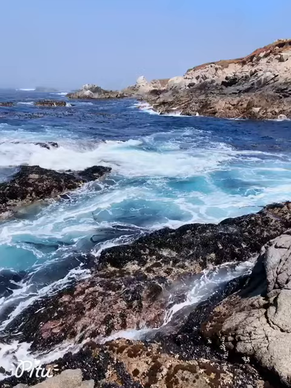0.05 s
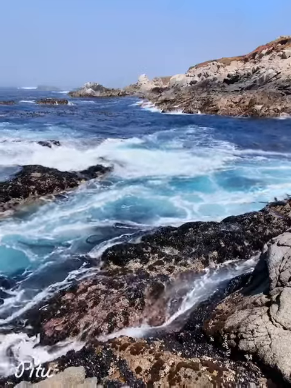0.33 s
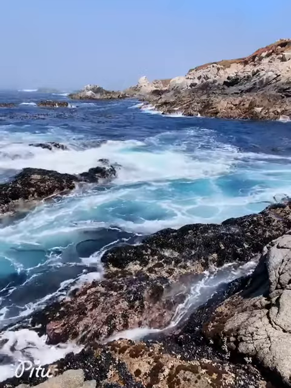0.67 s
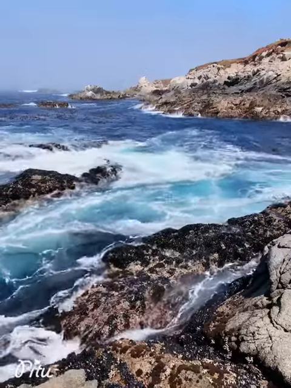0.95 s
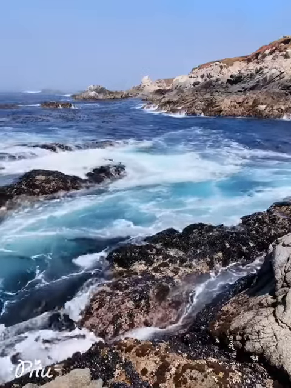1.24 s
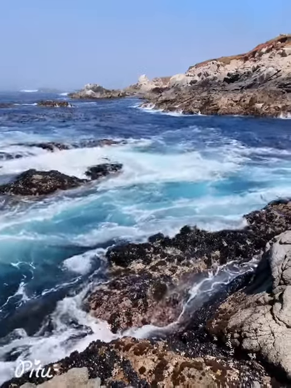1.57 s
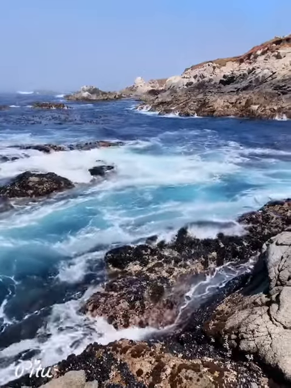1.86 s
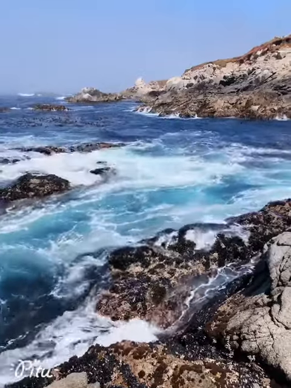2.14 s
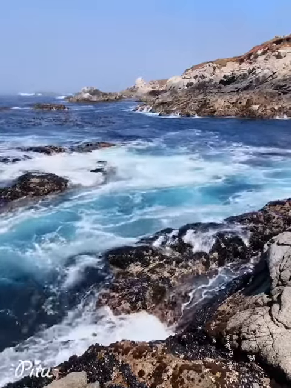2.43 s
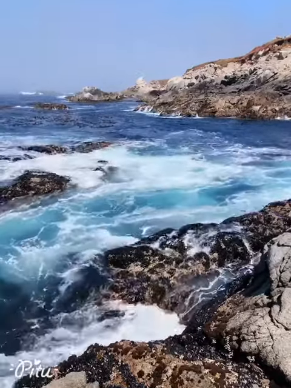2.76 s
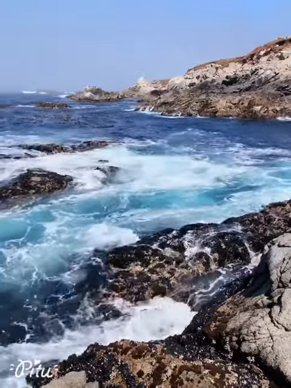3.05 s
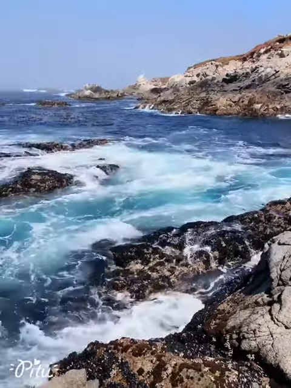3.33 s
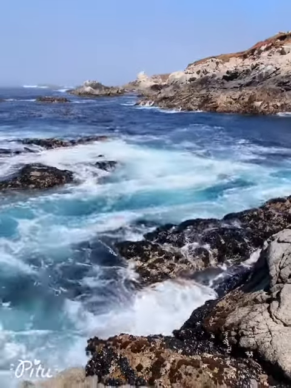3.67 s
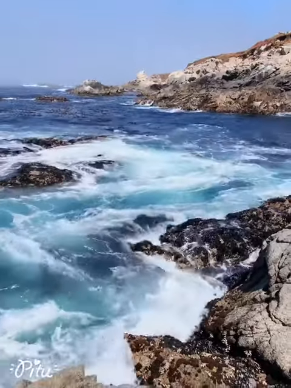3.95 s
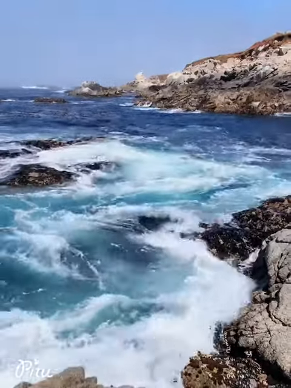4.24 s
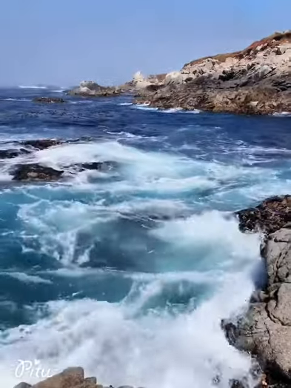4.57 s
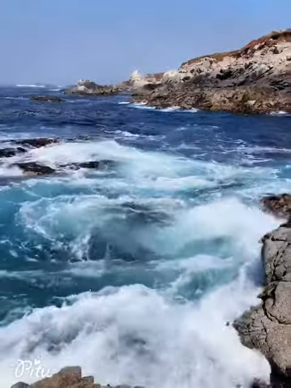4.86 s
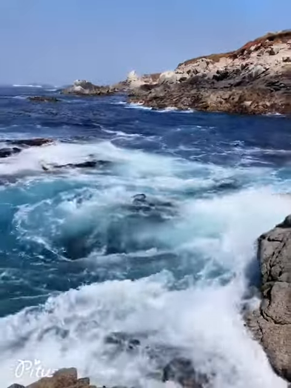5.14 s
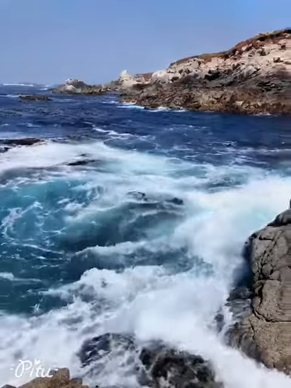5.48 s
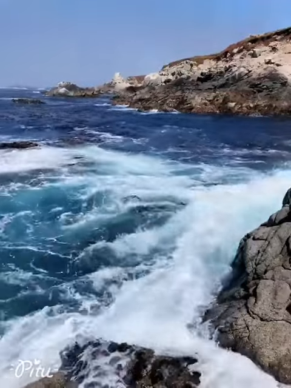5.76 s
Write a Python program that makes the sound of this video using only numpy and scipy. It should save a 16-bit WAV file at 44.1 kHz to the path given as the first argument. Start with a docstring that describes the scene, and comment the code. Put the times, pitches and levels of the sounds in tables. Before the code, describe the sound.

Surf churns in a rocky cove, heard from the rocks just above the water. Waves swell one after another with a roar, fizzing foam and spray pattering on stone, and a thin hiss of runoff drains away early on. Gusty wind rumbles and drums directly on the microphone, louder than the sea. It is strongest around the middle, with clusters of hard pops, then eases somewhat toward the end.

```python
"""Surf in a rocky cove, heard from the rocks just above a gully that floods as each wave breaks.
Bubbles make the white water roar and its foam fizz; spray rains on rock, runoff hisses down a channel.
Right at the microphone, a gusty sea wind rumbles and drums, louder than the water below.
Its hardest eddies pop on the port and push a limiter down."""
import sys
import numpy as np
from scipy import signal
from scipy.fft import rfft, irfft, next_fast_len
from scipy.io import wavfile
from scipy.ndimage import uniform_filter1d, minimum_filter1d

SR = 44100
rng = np.random.default_rng(int(sys.argv[2]) if len(sys.argv) > 2 else 0)


def wrap_up_sound(samples):
    """Save the sound to the file named by the first command line argument, as 16-bit audio."""
    columns = np.atleast_2d(samples).T
    # keep every value between -1 and 1, then stretch to whole-number steps
    tamed = np.clip(columns, -1, 1)
    steps = np.round(tamed * 32767).astype(np.int16)
    wavfile.write(sys.argv[1], SR, steps)


N = 264864

# hard eddies that strike the microphone: (time [s], level [dB], pitch [Hz], decay [s], crispness [dB])
HARD_EDDIES = [(0.484, -15, 698, 0.0032, 4), (0.703, -19, 535, 0.0027, -2), (0.715, -16, 798, 0.0027, 2),
               (0.74, -13, 643, 0.0032, 0), (1.151, -10.5, 603, 0.0064, -8), (2.205, -4.5, 781, 0.005, 0),
               (2.227, -4.5, 171, 0.0048, 10), (2.462, -10, 658, 0.0047, -2), (2.498, -6, 604, 0.004, -2),
               (2.588, -0.5, 822, 0.0022, 3), (2.631, -3, 799, 0.0034, 5), (2.727, -5, 539, 0.0047, -4),
               (2.737, 1, 598.6, 0.0047, 0), (2.747, 1.5, 187, 0.0055, 0), (2.87, -10, 635, 0.0038, -1),
               (2.92, -10, 603, 0.0053, -2), (2.935, -9.5, 682, 0.0055, -5), (2.954, -8, 473, 0.0055, -4),
               (3.089, -3.5, 568, 0.0044, -4), (3.162, -6, 501, 0.0038, -4), (3.21, -12, 672, .003, 3),
               (3.241, -10, 765, 0.007, -5), (3.26, -9, 602, 0.0046, -3), (3.359, -14, 600, 0.0084, -2),
               (3.602, -14, 731, 0.0078, -1), (3.78, -9.5, 700, 0.0057, -2), (4.025, -10, 534, 0.0032, 2),
               (4.037, -13, 758, 0.0036, 3), (4.364, -4, 660, 0.0056, -7), (4.375, -6.5, 689, 0.0022, -2),
               (4.421, -5.5, 255.4, 0.017, 5), (4.527, -8, 521, 0.0067, 4), (4.624, -14, 571, 0.0032, -6),
               (5.514, -2.5, 702, 0.0028, 3), (5.888, -8.5, 545, 0.0023, -5), (5.949, -9, 549, 0.0025, -1)]


def from_db(db):
    """Decibels to gain."""
    return 10 ** (np.asarray(db) / 20)


def rms_one(x):
    """Scale to unit power."""
    return x / np.sqrt(np.mean(x ** 2) + 1e-20)


def in_time(curve):
    """A curve of (time, value) points, sample by sample."""
    return np.interp(np.arange(N) / SR, *np.transpose(curve))


def hump(middle_s, rise_s, fall_s):
    """A rounded rise to 1 and fall back."""
    t = np.arange(N) / SR - middle_s
    return np.exp(-np.minimum((t / np.where(t < 0, rise_s, fall_s)) ** 2, 50))


def drift(per_s):
    """A smooth random wander with spread 1, changing about per_s times a second."""
    hop, settle = 40, 2000
    pole = np.exp(-2 * np.pi * hop * per_s / SR)
    noise = rng.standard_normal(N // hop + settle + 2)
    slow = signal.lfilter([1], [1, -2 * pole, pole * pole], noise)[settle:]
    return np.interp(np.arange(N) / hop, np.arange(len(slow)), rms_one(slow))


def coloured(x, spectrum):
    """Shape a sound by a spectrum, at unit power."""
    size = next_fast_len(N + SR // 4)
    hz, db = np.transpose(spectrum)
    bins = np.maximum(np.arange(size // 2 + 1) * SR / size, 1)
    gain = from_db(np.interp(np.log(bins), np.log(hz), db))
    gain *= np.minimum(bins / hz[0], 1) * np.minimum(hz[-1] / bins, 1) ** 2   # dies away past both ends
    return rms_one(irfft(rfft(x, size) * gain, size)[:N])


def bubbles(per_s, low_hz, high_hz, cycles, size_db, cloud_db, pitches=24):
    """Bubbles of random size are born in clouds; each rings at its pitch, dying 60 dB over its cycles."""
    out = np.zeros(N)
    sizes = from_db(size_db * np.minimum(rng.exponential(1, N), 5)) * rng.choice([-1, 1], N)
    born = rng.random(N) < per_s / SR
    pitch_index = rng.integers(0, pitches, N)
    for k, hz in enumerate(np.geomspace(low_hz, high_hz, pitches)):
        clicks = sizes * (pitch_index == k) * born
        decay, angle = from_db(-60 * hz / (cycles * SR)), 2 * np.pi * hz / SR
        rings = signal.lfilter([1, 0, -1], [1, -2 * decay * np.cos(angle), decay ** 2], clicks + 1e-18)
        out += rms_one(rings) * np.sqrt(hz) * from_db(cloud_db * drift(6.1))
    return rms_one(out)


def white_water(near, spectrum, far_db, slosh_db, slosh_per_s):
    """Near bubbles over the smooth rush of countless far ones, all sloshing together."""
    rush = from_db(far_db) * rng.standard_normal(N)
    return coloured(near + rush, spectrum) * from_db(slosh_db * drift(slosh_per_s))


def breaking_waves(spray_lag_s=0.016):
    """Flow of churn, foam, sheets and spray in dB: each wave adds power to the wash, its spray late."""
    # the wash between waves: (churn [dB], foam [dB], sheets running over rock [dB], spray [dB])
    wash = (-33, -41, -47.5, -49)
    # waves on the ledge: (crest [s], build [s], drain [s], churn [dB], foam [dB], sheets [dB], spray [dB])
    waves = [(0.17, 0.76, .3, -36, -43, -50, -65), (0.87, 0.17, 0.31, -35.5, -42, -50.5, -48.5),
             (1.55, 0.27, .3, -45, -54, -62, -57), (2.05, 0.17, 0.34, -33, -44.5, -47.5, -49.5),
             (2.42, .13, 0.24, -38.5, -41.5, -44.5, -44.5), (2.685, 0.13, 0.09, -37, -41, -44, -46),
             (3.1, 0.14, 0.3, -39, -54, -45.5, -48.5), (4.2, .52, 0.51, -34, -47.5, -43.5, -49.5),
             (5.25, 0.36, 0.38, -35.5, -45.5, -45.5, -51)]
    power = np.outer(from_db(wash) ** 2, np.ones(N))
    for crest_s, build_s, drain_s, *levels_db in waves:
        surge = hump(crest_s, build_s, drain_s)
        shower = hump(crest_s + spray_lag_s, build_s, drain_s)
        power += from_db(levels_db)[:, None] ** 2 * [surge, surge, surge, shower]
    return 10 * np.log10(power)


def surf():
    """Just below, big bubbles roar, small ones fizz in foam and running sheets, drops crackle on rock."""
    # tones of the white water as heard through the microphone, which dulls the roar above 2 kHz:
    # (frequency [Hz], level [dB])
    churn_tone = [(150, -29), (400, -16), (800, -4.5), (1150, -1.5), (1600, 2), (1930, 2.5), (2080, -4),
                  (2300, -13), (2700, -39), (5000, -45)]
    foam_tone = [(1500, 1.5), (2400, -3), (2900, -2.5), (3200, -0.5), (3450, 0), (3750, -2), (4150, -2.5),
                 (4600, -10), (6000, -7), (11500, -34)]
    sheet_tone = [(3000, -7), (4300, 1.5), (4800, 1), (5150, 0.5), (5600, 1), (6200, -5), (7000, -14.5),
                  (11500, -25)]
    spray_tone = [(2000, -21), (3500, -0.5), (6000, 3), (7200, 3), (8500, 2), (10000, 0), (11500, -2.5),
                  (13000, -37)]
    flows_db = breaking_waves()
    churn_db, foam_db, sheets_db, spray_db = flows_db
    # more flow, more bubbles and drops a second
    churn_rate, foam_rate, sheet_rate, spray_rate = [from_db(db - db.mean()) for db in flows_db]
    big = bubbles(2500 * churn_rate, 408, 2466, cycles=14, size_db=0, cloud_db=0.5)
    small = bubbles(6000 * foam_rate, 2314, 4890, cycles=38, size_db=1, cloud_db=1.5)
    tiny = bubbles(8000 * sheet_rate, 4010, 8100, cycles=32, size_db=-0.5, cloud_db=3)
    drops = bubbles(9000 * spray_rate, 3300, 14600, cycles=6.6, size_db=2.5, cloud_db=1)
    churn = white_water(big, churn_tone, far_db=8.5, slosh_db=0.5, slosh_per_s=5.2)
    foam = white_water(small, foam_tone, far_db=7.5, slosh_db=0.7, slosh_per_s=6.8)
    sheets = white_water(tiny, sheet_tone, far_db=-0.5, slosh_db=1, slosh_per_s=15)
    spray = white_water(drops, spray_tone, far_db=12, slosh_db=0.9, slosh_per_s=8.9)
    water = (from_db(churn_db + 0.14) * churn + from_db(foam_db + 1) * foam
             + from_db(sheets_db - 0.7) * sheets + from_db(spray_db + 3) * spray)
    return water * from_db(0.34 * drift(16))


def turbulence(spectrum, lumps_db, steady_s):
    """Pressure of passing eddies: it comes in lumps, while the flow holds its mean strength."""
    pressure = coloured(rng.standard_normal(N) * from_db(lumps_db), spectrum)
    return pressure / np.sqrt(uniform_filter1d(pressure ** 2, int(steady_s * SR)) + 1e-9)


def wind():
    """On the microphone, large eddies rumble and thump, middling ones flutter, small ones tear."""
    # the sea wind about its usual strength, freshening and then easing: (time [s], level [dB])
    strength = [(0.04, -8.5), (0.2, -0.7), (0.72, 2.5), (1.02, 0.5), (1.4, -1.3), (1.75, 3), (2.1, 1),
                (2.65, 6), (3.25, 2.5), (3.9, -2), (4.45, 3), (4.75, -0.8), (5.7, -2.5), (6.0, -4.5)]
    # brief gusts, and lulls where the lift is negative: (middle [s], length [s], lift [dB])
    gusts = [(0.326, 0.051, -0.5), (0.445, 0.083, 1.5), (0.56, 0.06, -1), (0.724, 0.074, 0.5),
             (1.19, 0.12, 3), (1.51, 0.17, 2.5), (1.76, 0.13, 0.5), (2.275, .04, -1), (2.327, 0.018, 3),
             (2.87, 0.04, 1.5), (2.933, 0.039, 3), (3.014, 0.058, -3.5), (3.237, 0.081, 2),
             (3.38, 0.1, 1.5), (3.534, .04, -0.5), (3.596, 0.041, 4), (3.71, 0.17, 2.5), (4.043, 0.03, 4.5),
             (4.163, 0.063, 3), (4.3, 0.077, -4), (4.714, 0.078, -1.5), (4.88, 0.049, -2),
             (5.333, 0.085, -2.5), (5.49, 0.11, 3), (5.671, 0.037, -7), (5.967, 0.088, 4.5)]
    # big slow eddies that thump the microphone: (middle [s], length [s], level [dB])
    thumps = [(0.137, 0.077, -15.5), (0.81, 0.11, -14.5), (1.803, 0.24, -16.5), (2.0, 0.07, -11.5),
              (2.34, 0.018, -3.5), (2.575, 0.049, -13.5), (2.715, 0.03, -11), (3.161, 0.026, -5.5),
              (3.267, 0.045, -7.5), (3.42, 0.11, -12.5), (4.53, 0.031, -11)]
    # how each size of eddy grows: (usual level [dB], growth with wind [dB/dB], growth with gusts [dB/dB])
    large_law = (-20, 0.56, 0.17)
    middle_law = (-15.5, 0.61, 0.93)
    small_law = (-28, 1.11, 2.15)
    # spectra of large, middling and small eddies: (frequency [Hz], level [dB])
    rumble_tone = [(12, -7), (25, -2), (40, -1), (54, 4.5), (75, -0.5), (105, 0), (150, -16), (300, -33)]
    flutter_tone = [(60, -22), (100, -3.5), (130, -0.8), (165, 0.74), (210, 0), (260, 0), (320, -3.5),
                    (420, -6.5), (520, -16), (700, -22.5), (1200, -50)]
    tearing_tone = [(280, -38), (420, -2), (520, -3), (650, -6.5), (800, -10), (1000, -15), (1400, -20),
                    (2200, -38.5)]
    wind_db = in_time(strength)
    gust_db = sum(lift_db * hump(s, length / 2, length / 2) for s, length, lift_db in gusts)
    laws = (large_law, middle_law, small_law)
    rumble_db, flutter_db, tearing_db = [usual_db + by_wind * wind_db + by_gust * gust_db
                                         for usual_db, by_wind, by_gust in laws]
    thump_power = sum(from_db(db) ** 2 * hump(s, length / 2, length / 2) for s, length, db in thumps)
    rumble_gain = np.sqrt(from_db(rumble_db) ** 2 + thump_power)
    lumps = drift(51)   # an eddy breaks into smaller ones, so all sizes swell together, the smallest most
    rumble = rumble_gain * turbulence(rumble_tone, lumps_db=lumps, steady_s=0.155)
    flutter = from_db(flutter_db) * turbulence(flutter_tone, lumps_db=1.14 * lumps, steady_s=0.11)
    tearing = from_db(tearing_db) * turbulence(tearing_tone, lumps_db=2.3 * lumps, steady_s=0.087)
    return rumble + flutter + tearing


def runoff():
    """Thin fast water from an earlier wave fizzes down a channel in the rock and dwindles."""
    # spectrum of the hiss: (frequency [Hz], level [dB])
    hiss_tone = [(3000, -14), (4700, -12), (5100, 1), (5500, -1), (6050, 5), (6600, 1), (7200, -12),
                 (7900, -8), (8500, -1.5), (10000, -1), (11500, -7), (13000, -35)]
    # flow as the channel empties: (time [s], level [dB])
    flow = [(0.04, -44), (0.9, -48.5), (1.15, -47), (1.45, -54), (2.0, -78)]
    fizz = bubbles(8000, 4100, 11500, cycles=18, size_db=3.5, cloud_db=5)
    return from_db(in_time(flow)) * white_water(fizz, hiss_tone, far_db=4, slosh_db=0, slosh_per_s=12)


def drumming(band_ratio=1.86, edge_db=-22):
    """Runs of like-sized eddies drum on the microphone port, each run about its own pitch."""
    # runs of middling eddies: (middle [s], length [s], level [dB], pitch [Hz])
    runs = [(0.224, 0.095, -20, 140), (0.677, 0.054, -14.5, 274), (0.755, 0.08, -13, 218),
            (1.17, 0.037, -19, 380), (1.758, 0.095, -14, 242), (1.868, 0.085, -16, 169),
            (2.078, 0.13, -20, 132), (2.22, 0.034, -12, 150), (2.34, 0.041, -13, 141),
            (2.423, 0.23, -23.5, 440), (2.6, 0.14, -12.5, 125), (2.66, .12, -20, 400),
            (2.78, 0.026, -14, 250), (2.96, 0.1, -13.5, 141), (3.203, 0.074, -17, 150),
            (3.373, 0.14, -22, 466), (3.716, 0.066, -21, 384), (4.06, 0.066, -21, 400),
            (4.2, 0.087, -24, 447), (4.373, 0.038, -9, 200), (4.466, 0.096, -17, 237),
            (5.81, .05, -18, 218), (5.89, 0.027, -16.5, 260)]
    out = np.zeros(N)
    for middle_s, length_s, db, hz in runs:
        band = [(hz / band_ratio, edge_db), (hz, 0), (hz * band_ratio, edge_db)]
        fade_s = length_s * np.sqrt(0.5)
        out += from_db(db) * hump(middle_s, fade_s, fade_s) * turbulence(band, lumps_db=0, steady_s=0.03)
    return out


def buffets(rise_cycles=0.59, sag=0.147, ragged=0.24, rough_db=1.5):
    """Each hard eddy pops on the port: swirls of several sizes, uneven swings that slow as they die."""
    # swirls relative to their eddy: (pitch [ratio], level [dB], decay [ratio], crispness [ratio])
    swirls = [(1.6, -11, 0.79, 0.9), (1.0, -2, 1.04, 0), (.65, -2.5, 1.03, 0), (.33, -6, 1.1, 0)]
    out = np.zeros(N)
    for pitch_ratio, swirl_db, decay_ratio, crisp_ratio in swirls:
        wobble = np.exp(ragged * drift(487))
        uneven = rms_one(from_db(rough_db * drift(450)))
        for strike_s, eddy_db, eddy_hz, decay_s, crisp_db in HARD_EDDIES:
            span = np.arange(int((strike_s - 0.03) * SR), min(int((strike_s + 0.06) * SR), N))
            t = span / SR - strike_s
            swirl_hz, fall_s = eddy_hz * pitch_ratio, decay_s * decay_ratio
            envelope = np.exp(-np.where(t < 0, (t * swirl_hz / rise_cycles) ** 2, t / fall_s))
            pitch_hz = swirl_hz * wobble[span] * (1 - sag * np.tanh(t / fall_s / 2))
            phase = 2 * np.pi * (np.cumsum(pitch_hz) / SR + rng.random())
            gain = from_db(eddy_db + swirl_db + crisp_ratio * crisp_db)
            out[span] += gain * envelope * uneven[span] * np.sin(phase)
    return out


def swept_aside(depth_db=8):
    """Gain of the ordinary wind: a hard eddy briefly pushes it off the port, the more the harder it is."""
    push = sum(from_db(db) * hump(s, decay_s, 2 * decay_s) for s, db, _, decay_s, _ in HARD_EDDIES)
    return from_db(-depth_db * push)


def limiter(x, ceiling_db, release_db_per_s):
    """The gain drops just ahead of each peak over the ceiling, then climbs back."""
    over_db = np.maximum(20 * np.log10(np.abs(x) + 1e-9) - ceiling_db, 0)
    release_db = release_db_per_s * np.arange(N) / SR
    cut_db = np.maximum.accumulate(over_db + release_db) - release_db
    held_db = minimum_filter1d(-cut_db, size=89)   # a 2 ms window
    return x * from_db(uniform_filter1d(held_db, size=89))


def scene():
    """One microphone on the rocks: the sea just below, the wind right on the port."""
    sea = surf()
    blowing = (wind() + drumming()) * swept_aside()
    return (sea + blowing + buffets() + runoff())[None]


def record(dry):
    """The sound starts after an instant of silence, peaks are limited, the top treble is cut."""
    sound_on = np.arange(N) / SR >= 0.035
    limited = limiter(dry[0] * sound_on, ceiling_db=-0.8, release_db_per_s=340)
    lowpass = signal.ellip(12, 0.1, 80, 11900, fs=SR, output="sos")
    return signal.sosfilt(lowpass, limited)[None]


dry = scene()
out = record(dry)
wrap_up_sound(out)
```